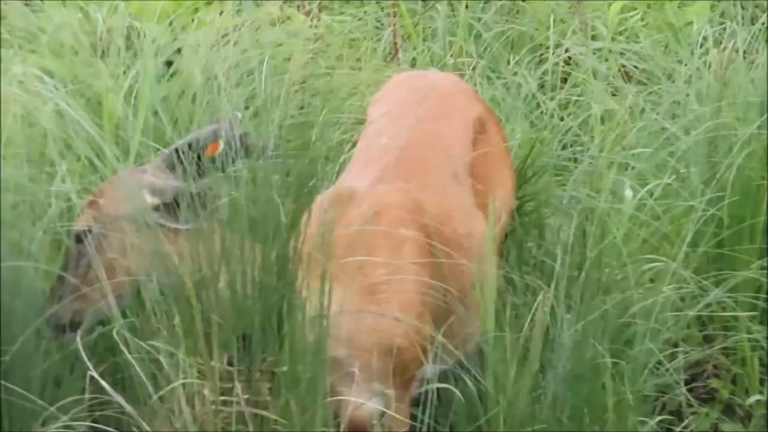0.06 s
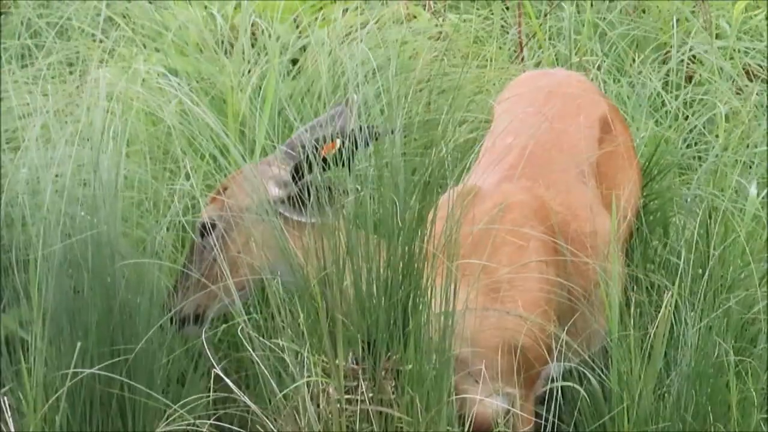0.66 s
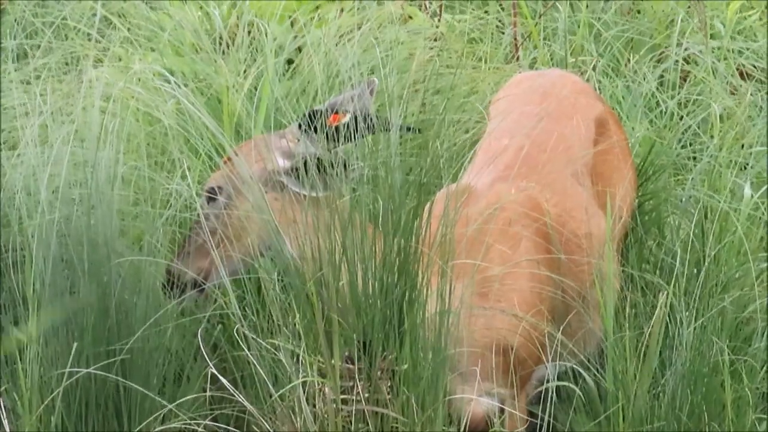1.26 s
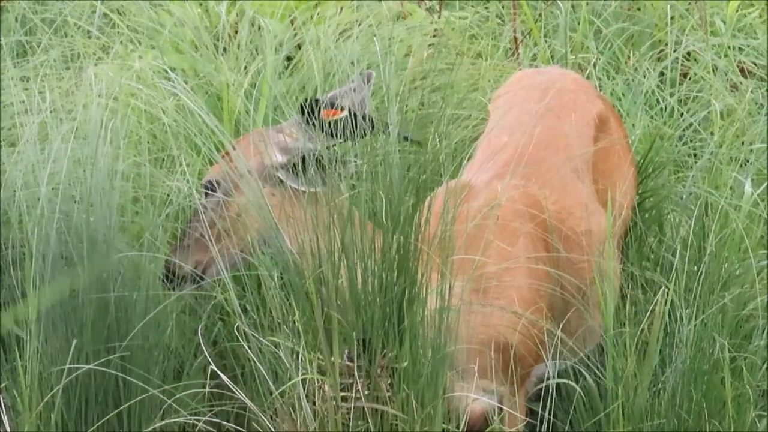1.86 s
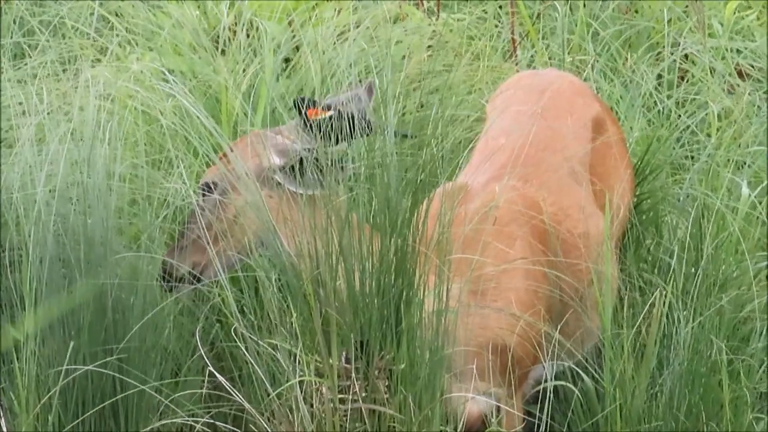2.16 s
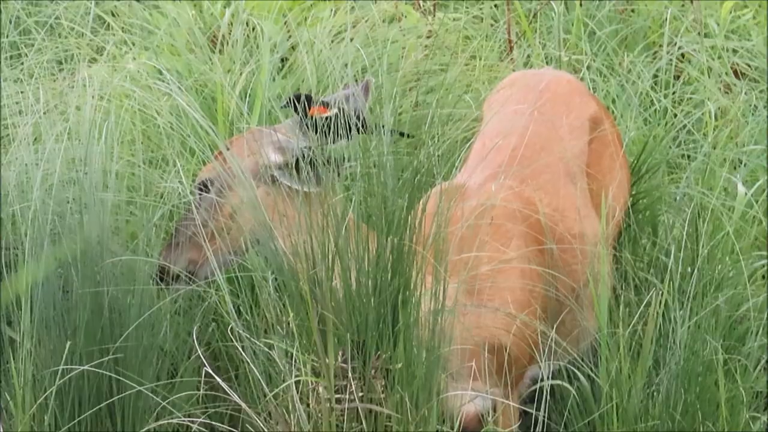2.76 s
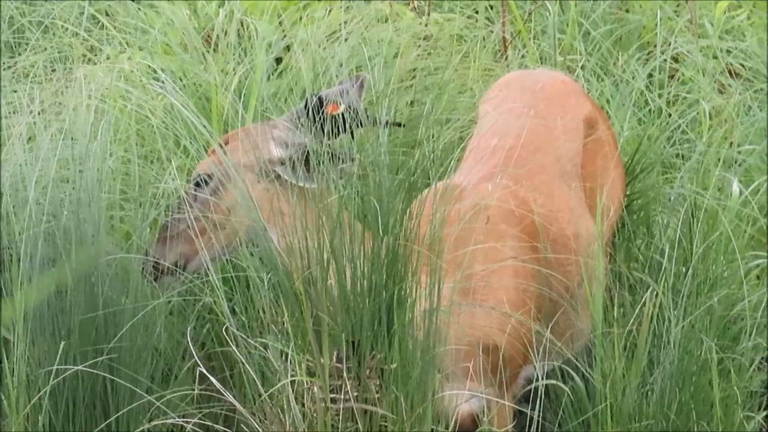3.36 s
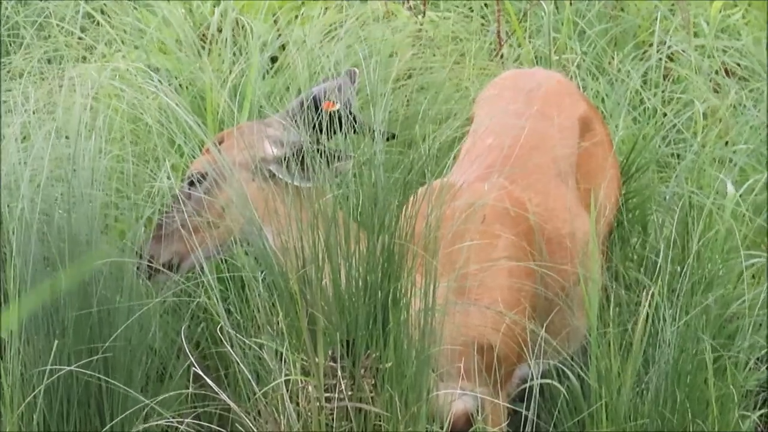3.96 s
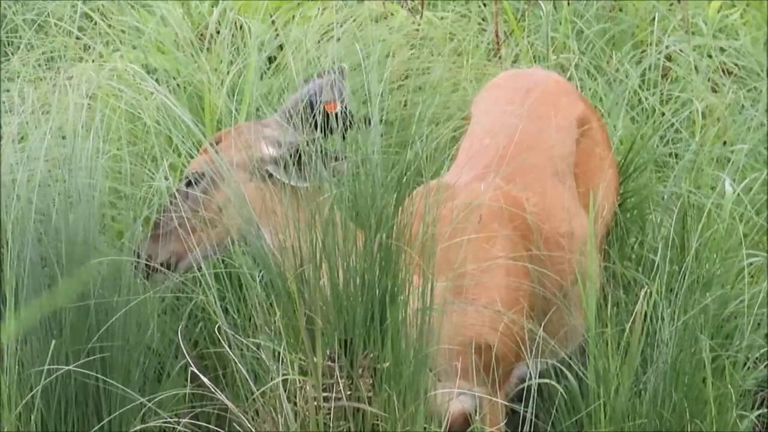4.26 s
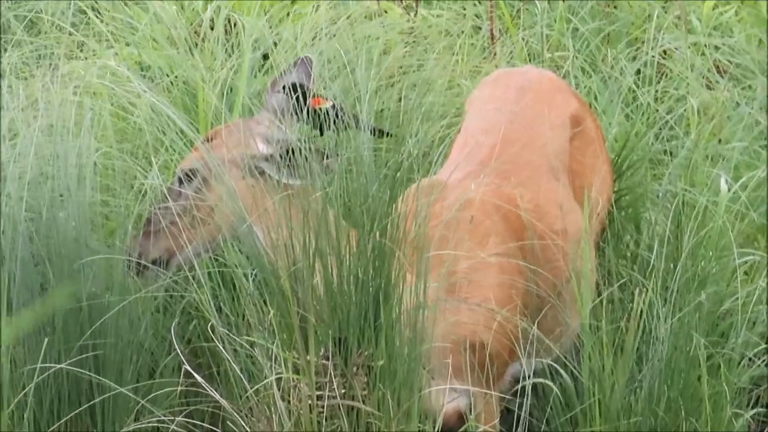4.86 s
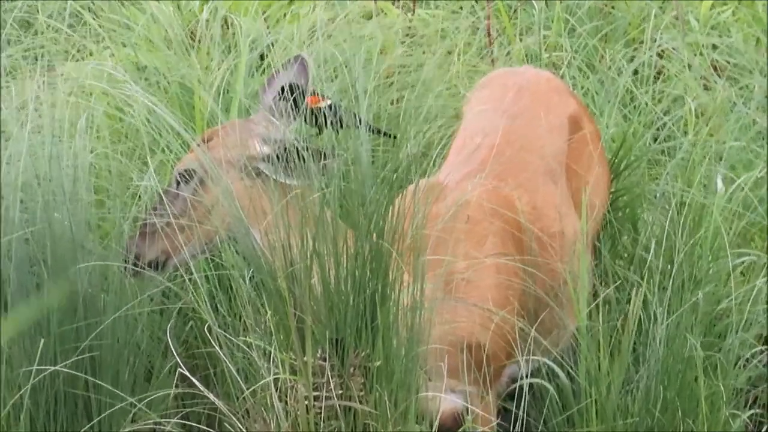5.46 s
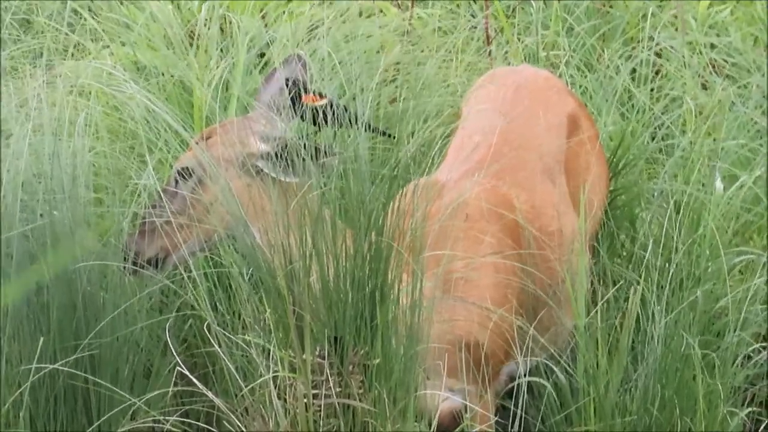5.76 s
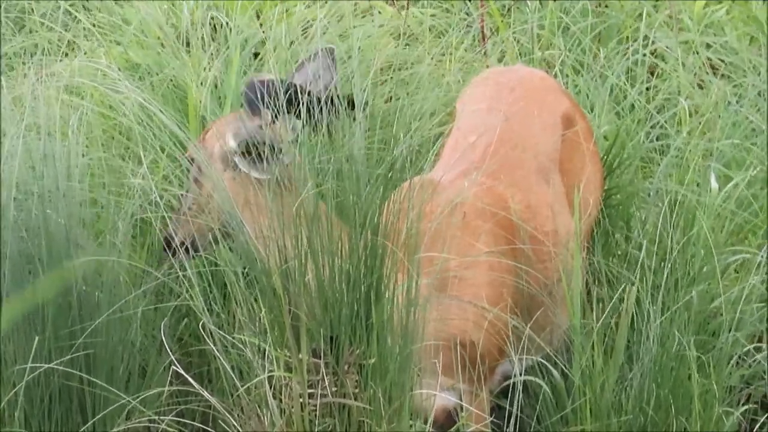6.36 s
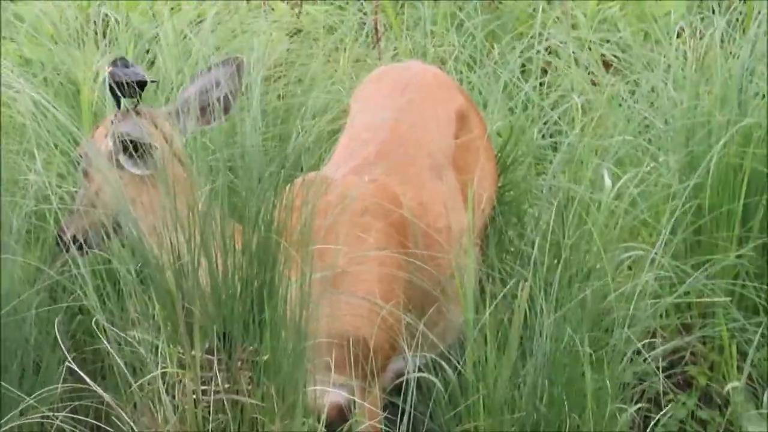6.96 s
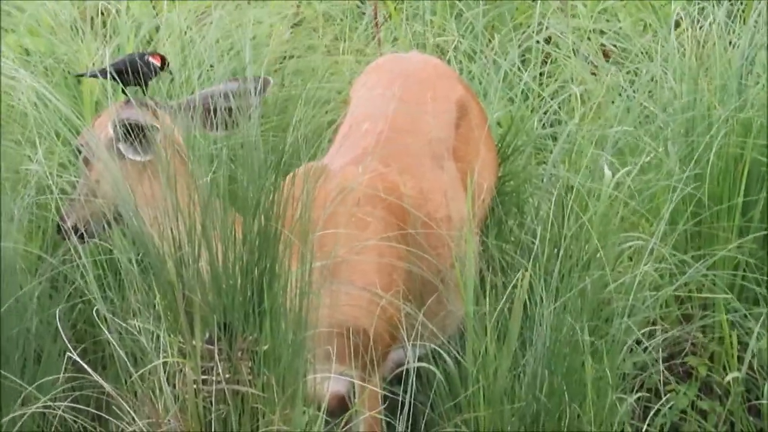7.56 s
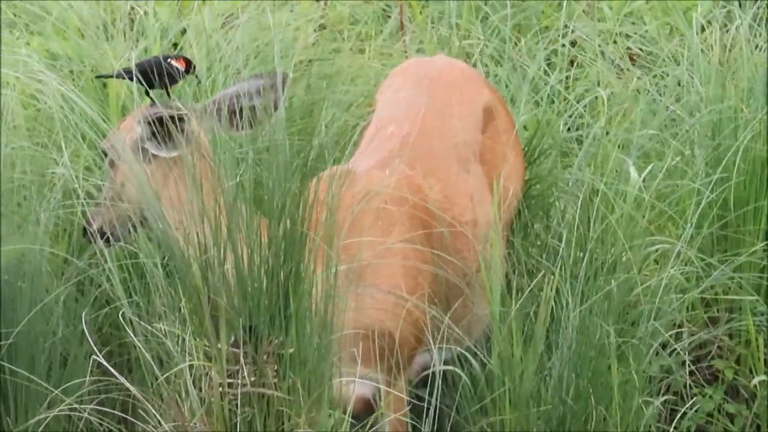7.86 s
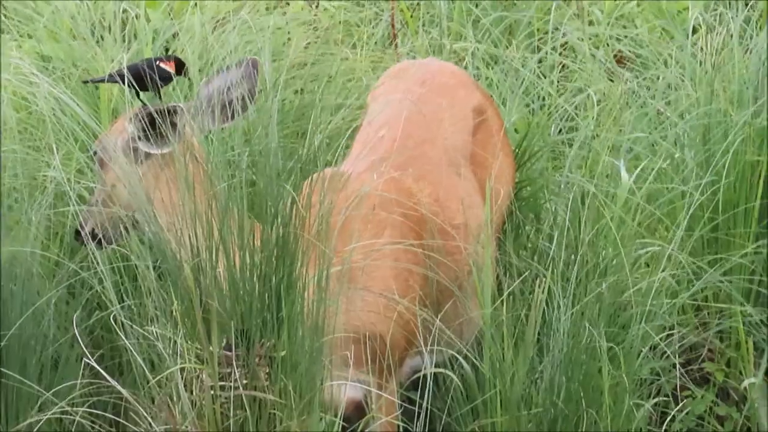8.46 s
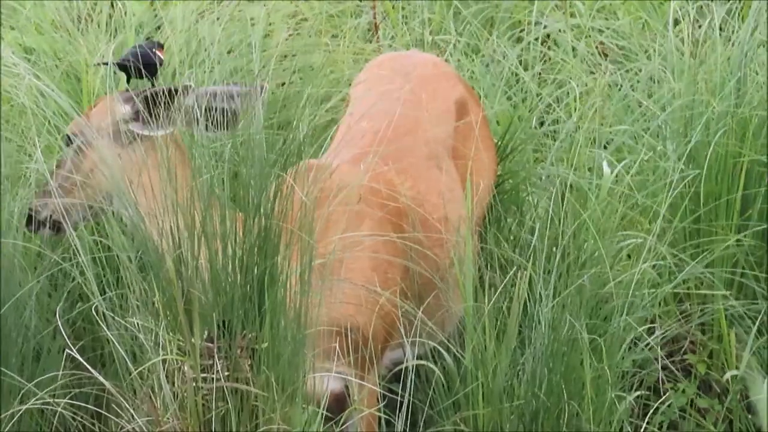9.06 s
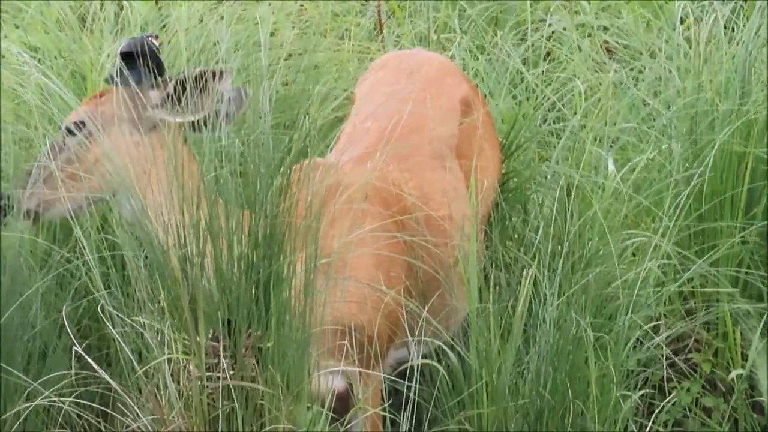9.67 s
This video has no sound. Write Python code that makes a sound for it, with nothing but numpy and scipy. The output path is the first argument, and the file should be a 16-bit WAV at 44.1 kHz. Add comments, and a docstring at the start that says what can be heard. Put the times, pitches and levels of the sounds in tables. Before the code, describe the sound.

Steady outdoor air with a nearby blackbird's harsh chirps and one loud buzzy whistle, then a faint songbird far away.

```python
"""An open marsh, a stereo microphone in a steady rush of air with a faint whir and two soft low swells. A red-
winged blackbird riding on a deer gives a sharp chek, a rasp, four falling chirps after a lead-in note, and a
loud buzzing whistle, all from breath driving the two membranes of its syrinx. Far off a songbird warbles in
pure glides, and faint ticks from the grass and a fluttering wing come now and then. The ground and the
vegetation send back a faint echo."""
import sys
import numpy as np
from scipy import signal
from scipy.fft import rfft, irfft, next_fast_len
from scipy.io import wavfile
from scipy.ndimage import map_coordinates

SR = 44100
rng = np.random.default_rng(int(sys.argv[2]) if len(sys.argv) > 2 else 0)


def persist_wave(psi):
    """Save psi, clipped to +-1, as 16-bit WAV."""
    counts = np.round(np.clip(psi, -1, 1) * 32767).astype(np.int16)
    wavfile.write(sys.argv[1], SR, np.atleast_2d(counts).T)


N = 428211


def amp(db):
    """Decibels to gain."""
    return 10 ** (np.asarray(db) / 20)


def unit(x):
    """x at rms 1."""
    return x / np.sqrt(np.mean(x ** 2) + 1e-20)


def along(points, hz):
    """(Hz, value) points read on a log frequency axis."""
    freqs, values = np.transpose(points)
    return np.interp(np.log(hz + 1), np.log(freqs + 1), values)


def span(start, end):
    """The sample times from start to end, in seconds."""
    return start + np.arange(max(round((end - start) * SR), 8)) / SR


def ramp(t, length):
    """0 before t = 0, rising straight to 1 over length."""
    return np.clip(t / length, 0, 1)


def envelope(t, start, end, attack, release):
    """Attack, hold at 1, release."""
    return ramp(t - start, attack) * ramp(end - t, release)


def settle(t, time_s):
    """1 until t = 0, then dying away exponentially."""
    return np.exp(-np.maximum(t, 0) / time_s)


def wobble(t, rate):
    """A smooth random curve, rate knots a second."""
    knots = (t - t[0]) * rate
    return map_coordinates(rng.standard_normal(int(knots[-1]) + 4), [knots])


def filtered(x, response):
    """x shaped by a frequency response."""
    n = x.shape[-1]
    padded = next_fast_len(n + 8192)
    return irfft(rfft(x, padded) * response(np.fft.rfftfreq(padded, 1 / SR)), padded)[..., :n]


def band(size, hz, width):
    """Noise of rms 1 in one resonance."""
    return unit(filtered(rng.standard_normal(size), lambda f: 1 / (1 + ((f - hz) / width) ** 2)))


def phase_of(hz):
    """Phase of an oscillator that follows a pitch curve."""
    return 2 * np.pi * np.cumsum(hz) / SR


def track(sounds):
    """(start in seconds, sound) pairs on one time line."""
    out = np.zeros(N)
    for start, sound in sounds:
        part = out[round(start * SR):][:len(sound)]
        part += sound[:len(part)]
    return out


# The air all around the microphone. Each row: frequency in Hz, relative noise density in dB.
AIR_SPECTRUM = [(20, -5), (35, -4), (55, 0), (120, -0.5), (280, -1), (450, -4.5), (700, -7), (1200, -11.5),
                (2000, -15), (4000, -20), (7000, -27), (10000, -33), (13500, -39.5), (15500, -44.5)]
# Its spread across the microphone pair. Each row: frequency in Hz, left-right correlation.
AIR_CORRELATION = [(25, 1), (60, 0.99), (95, 0.59), (150, 0.18), (330, -0.24), (520, -0.21), (1200, 0.052),
                   (2700, 0.12), (6000, .35), (10000, 0.24)]


def air():
    """The steady rush of the open field, alike left and right only in the bass."""
    def mid_and_side(hz):
        angle = np.arccos(np.clip(along(AIR_CORRELATION, hz), -1, 1)) / 2
        return amp(along(AIR_SPECTRUM, hz)) * [np.cos(angle), np.sin(angle)]

    mid, side = filtered(rng.standard_normal((2, N)), mid_and_side)
    level_db = -49 + .6 * wobble(np.arange(N) / SR, 3)
    return amp(level_db) * unit(np.array([mid + side, mid - side]))


# Dead centre, low in the rush of air. Each row: centre in Hz, relative width, level in dB.
WHIR_BANDS = [(512.6, 25, -70), (768, 32, -62.5), (845.2, 63, -57.5), (877, 14.6, -64.5), (1037, 20, -70.5)]


def whir():
    """A faint steady whir of narrow noise bands."""
    return sum(amp(db) * band(N, hz, width * .64) for hz, width, db in WHIR_BANDS)


def syrinx_tone(hz, second_db, third_db):
    """A bird's tone with two weak overtones."""
    phase = phase_of(hz)
    return np.sqrt(2) * sum(amp(db) * np.sin(k * phase) for k, db in enumerate([0, second_db, third_db], 1))


def chek(start=.2655, level_db=-37.2, attack_s=.014, decay_db_per_s=720):
    """A quick push of breath lifts the pitch of a harsh, fluttering tone half broken into noise."""
    t = span(0, .046)
    push = np.sqrt(ramp(t, attack_s)) * amp(-decay_db_per_s * np.maximum(t - attack_s, 0))
    hz = (3780 + 240 * push) * (1 + .032 * wobble(t, 900))
    flutter = .85 + .4 * band(len(t), 200, 150)
    tone = flutter * syrinx_tone(hz, second_db=-32, third_db=-40)
    side_tones = amp(-16.5) * band(len(t), 1650, 120) + amp(-21) * band(len(t), 2800, 120)
    hiss = amp(-18) * band(len(t), 3900, 5100)
    return start, amp(level_db) * push * (tone + side_tones + hiss)


# Faint ticks and knocks, well away from the microphone; the one near 6.63 s is a flutter of wings. # Each row:
# start in seconds, relative level in dB, centre in Hz, length in seconds.
FAINT_TICKS = [(.667, -51, 2400, .012), (1.234, -56, 1900, .006), (2.05, -46.5, 360, .022),
               (6.452, -56, 2600, .014), (6.633, -49, 900, .014)]


def faint_tick(start, db, hz, length):
    """A soft puff of noise from a bending stem, a step or a flutter of wings."""
    t = span(0, length)
    return start, amp(db) * np.sin(np.pi * t / length) * band(len(t), hz, hz / 3)


# Swells in the air on both sides of the microphone.
# Each row: crest time, rise and fall in seconds, level in dB.
AIR_SWELLS = [(2.0, .55, .15, -52.5), (6.36, .25, .25, -52)]


def air_swells():
    """A low rush that comes up softly twice, different left and right."""
    t = np.arange(N) / SR
    gain = sum(amp(db) * envelope(t, crest - rise, crest + fall, rise, fall)
               for crest, rise, fall, db in AIR_SWELLS)
    return gain * np.array([band(N, 220, 200), band(N, 220, 200)])


def rasp_voice(t, start, end, attack, release, db, fade_db_per_s, from_hz, to_hz, slide_at, slide_s):
    """Pitch and gain of one side of the syrinx: it swells, slides down one step and fades."""
    hz = to_hz + (from_hz - to_hz) * (1 - np.tanh((t - slide_at) / slide_s)) / 2
    fade_db = fade_db_per_s * np.maximum(t - start - attack, 0)
    return hz, envelope(t, start, end, attack, release) * amp(db - fade_db)


def rasp(start=3.051, end=3.257):
    """Two voices slide down together, lock into a rattle of upward flicks, then the upper one clears."""
    t = span(start, end)
    upper_hz, upper_gain = rasp_voice(t, start, end, attack=.046, release=.014, db=-42, fade_db_per_s=46,
                                      from_hz=3230, to_hz=2660, slide_at=3.122, slide_s=.032)
    lower_hz, lower_gain = rasp_voice(t, 3.062, 3.222, attack=.052, release=.03, db=-41.8,
                                      fade_db_per_s=82, from_hz=2600, to_hz=2315,
                                      slide_at=3.085, slide_s=.026)
    rough = envelope(t, 3.112, 3.222, attack=.022, release=.042)
    flick = np.cumsum(104 * (1 + .12 * wobble(t, 90))) / SR % 1
    bend = 1 + .15 * rough * (flick - .5)
    upper = phase_of(upper_hz * bend * (1 + .027 * rough * wobble(t, 600)))
    lower = phase_of(lower_hz * bend * (1 + .027 * rough * wobble(t, 497)))
    pair = upper_gain * np.sin(upper) + lower_gain * np.sin(lower)
    # the coupled membranes add sum and difference tones
    coupled = amp(-12) * np.sin(2 * upper - lower) + amp(-26) * np.sin(upper + lower)
    hiss = amp(-14.5) * rough * band(len(t), 4350, 250)
    rattle = amp(-2 * rough * np.cos(2 * np.pi * flick))
    return start, np.sqrt(2) * rattle * (pair + np.sqrt(upper_gain * lower_gain) * (coupled + hiss))


# The blackbird's chirps, a little left of the microphone; the first is only the falling end of one.
# Each row: time of the held note in seconds, begin and end in seconds from it, level in dB,
# held pitch in Hz, accent and second voice in dB relative to the level, fade-in in seconds.
BLACKBIRD_CHIRPS = [(3.287, .068, .124, -29.5, 3800, 0, -22, .014),
                    (3.4363, -.031, .122, -25.5, 3932, 4, -24, .006),
                    (3.581, -.034, .12, -27, 3877, 1.7, -22, .004),
                    (3.7258, -.032, .124, -27.4, 3902, 2.3, -23, .004),
                    (3.872, -.032, .085, -30, 3834, 1.2, -33, .008)]


def chirp(at, begin, end, level_db, held_hz, accent_db, under_db, fade_in):
    """Harsh downward flicks run into a held note, which falls away while a second voice rises under it."""
    flicks_per_s, ease_s = 115, .011
    break_at, break_s, bend_s, floor_hz = .054, .008, .006, 1800
    rise_db_per_s, sag_db_per_s, fade_db_per_s, sag_hz_per_s = 680, 31, 212, 730
    t = span(begin, end)
    stutter = ramp(-t, ease_s)
    broken = ramp(t - break_at, break_s)
    held_s = np.clip(t, 0, break_at)
    fallen_s = bend_s * np.logaddexp(0, (t - break_at) / bend_s)
    flick = ((t + .004) * flicks_per_s) % 1
    # the pitch overshoots, sags, then bends into the fall
    sagging_hz = held_hz + 127 * settle(t, .0125) - sag_hz_per_s * held_s
    hz = floor_hz + (sagging_hz - floor_hz) * settle(fallen_s, .051)
    jitter = (.002 + .014 * stutter + .011 * broken) * wobble(t, 900)
    hz *= 1 + .2 * stutter * (.5 - flick) + jitter
    # the level swells to an accent; at the break it catches, then turns weak and rough
    db = rise_db_per_s * np.minimum(t + ease_s / 2, 0) - sag_db_per_s * held_s
    db += accent_db * np.exp(-(t / .016 - .5) ** 2)
    catch_db = -5.5 * np.exp(-4 * ((t - break_at) / break_s - 1) ** 2)
    db += catch_db - 3.5 * broken - fade_db_per_s * fallen_s
    gate = 1 + stutter * (.3 - 1.1 * np.cos(np.pi * flick) ** 4) + .3 * broken * wobble(t, 400)
    # during the flicks the membrane flutters, throwing side tones and a little hiss
    flutter = 1 + .16 * stutter * np.sin(phase_of(880 * (1 + .1 * wobble(t, 200))))
    hiss = amp(-30) * stutter * band(len(t), 6000, 4000)
    note = amp(db) * (gate * flutter * syrinx_tone(hz, second_db=-59.5, third_db=-42.5) + hiss)
    under_at, under_hz, climb_hz_per_s = .06, 1900, 12500
    under_phase = phase_of((under_hz + climb_hz_per_s * (t - under_at)) * (1 + .01 * wobble(t, 600)))
    under_gain = np.sqrt(2) * amp(under_db) * envelope(t, under_at, .104, attack=.018, release=.012)
    under = under_gain * (np.sin(under_phase) + amp(-12) * np.sin(2 * under_phase))
    return at + begin, amp(level_db) * envelope(t, begin, end, fade_in, release=.01) * (note + under)


def squeak(start=4.457, end=4.482, from_hz=8400, to_hz=7200, level_db=-42.5):
    """A thin high tone just before the whistle slides down and levels out."""
    t = span(start, end)
    hz = to_hz + (from_hz - to_hz) * settle(t - start, .009)
    gain = amp(level_db) * envelope(t, start, end, attack=.008, release=.007)
    return start, np.sqrt(2) * gain * np.sin(phase_of(hz))


def buzz_sweep(cycle, jump=.26, jump_part=.12, sink_part=.34, gap_db=-16):
    """Pitch ratio and gain through one cycle of the buzz: the tone jumps up weakly, swells as it sinks."""
    ratio = 1 + jump * ramp(cycle, jump_part) * settle(cycle - jump_part, sink_part)
    late_swell = np.abs(np.sin(np.pi * cycle ** 1.58)) ** 1.4
    return ratio, amp(gap_db) + late_swell


def whistle(start=4.488, end=4.818, level_db=-23.4, grow_db_per_s=9):
    """A loud whistle: a pure high onset drops to a slowly sagging pitch as the buzz sets in."""
    drop_at, drop_hz, base_hz, sag_hz_per_s = 4.503, 1270, 3670, 620
    buzz_at, sweeps_per_s = 4.5115, 46.92
    t = span(start, end)
    hz = base_hz + drop_hz * settle(t - drop_at, .025) - sag_hz_per_s * (t - drop_at)
    db = level_db + grow_db_per_s * (t - t.mean())
    gain = amp(db) * envelope(t, start, end, attack=.074, release=.037)
    depth = envelope(t, 4.5, 4.804, attack=.02, release=.024)
    # the buzz starts a little hurried, then keeps its pace
    hurry_cycles = .62 * (1 - settle(t - buzz_at, .015))
    ratio, swell = buzz_sweep((sweeps_per_s * (t - buzz_at) + hurry_cycles) % 1)
    # the tone is least steady in the weak part of each sweep, where the pitch jumps
    jitter = (.003 + .018 * (1 - swell) ** 2 * depth) * wobble(t, 900)
    # as the buzz dies the pitch comes to rest in the middle of its sweep
    rest = 1 + .09 * ramp(t - drop_at, end - drop_at)
    phase = phase_of(hz * (depth * ratio + (1 - depth) * rest + jitter))
    second = amp(-37.5 + 3.5 * wobble(t, 410)) * np.sin(2 * phase)
    third = amp(-40.3 + 3.5 * wobble(t, 300)) * np.sin(3 * phase)
    sizzle = amp(-45) * band(len(t), 7700, 700) + amp(-55) * band(len(t), 13600, 1000)
    quiver = .1 * depth * wobble(t, 500)
    # the throat favours the low end of each sweep; the overtones swell much less
    fundamental = (swell ** depth + quiver) * np.sin(phase)
    overtones = swell ** (.55 * depth) * (second + third + sizzle)
    return start, np.sqrt(2) * gain * (fundamental + overtones)


def far_note(t, hz, db):
    """A pure note of the far songbird, made unsteady by the distance."""
    arch = np.abs(np.sin(np.pi * t / t[-1])) ** .49
    gain = amp(db + 2.4 * wobble(t, 120)) * arch
    return np.sqrt(2) * gain * np.sin(phase_of(hz * (1 + .004 * wobble(t, 385))))


# The songbird see-sawing far across the marsh.
# Each row: start in seconds, middle pitch in Hz, sweep in octaves, relative level in dB.
SONGBIRD_SLURS = [(5.337, 4000, -.7, -66), (5.41, 4150, .55, -67), (5.525, 3800, .45, -66),
                  (5.575, 3850, -.7, -66), (5.712, 3700, .55, -66.5), (5.905, 3450, -.5, -64),
                  (5.957, 3800, .7, -62.5), (6.088, 3700, .4, -61), (6.14, 3800, -.7, -64),
                  (6.277, 3950, .65, -61.5), (6.315, 4200, .35, -65), (8.68, 5250, -.3, -68),
                  (9.23, 5900, -.25, -68), (9.318, 5400, -.42, -65), (9.422, 3600, -.48, -62.5),
                  (9.481, 4850, .5, -64)]


def songbird_slur(start, middle_hz, octaves, db, length_s=.05, bow_octaves=.03):
    """One slightly bowed glide, up or down."""
    t = span(0, length_s)
    from_middle = t / length_s - .5
    hz = middle_hz * 2 ** (octaves * from_middle + bow_octaves * (2 * from_middle) ** 2)
    return start, far_note(t, hz, db)


# The same distant bird ending a phrase. Each row: start in seconds, pitch in Hz, relative level in dB.
SONGBIRD_ENDINGS = [(8.968, 4540, -62), (9.588, 4500, -52)]


def songbird_ending(start, hz, db, hold_s=.044, drop_s=.054, drop_octaves=.7, drop_db=11):
    """A held note that drops away in pitch and strength."""
    t = span(0, hold_s + drop_s)
    drop = ramp(t - hold_s, drop_s)
    return start, far_note(t, hz * 2 ** (-drop_octaves * drop ** 1.2), db - drop_db * np.sqrt(drop))


# The tail that reaches the microphone from the far vegetation.
# Each row: frequency in Hz, time to die away by 60 dB in seconds.
MARSH_DECAY = [(1000, .5), (4000, 0.57), (12000, .25)]


def marsh(x, grass_db=-21, tail_db=-26, ground_db=-18.5, ground_delay_s=.0075):
    """The ground answers within milliseconds, the grass scatters, far vegetation returns a faint tail."""
    hz, t, spectra = signal.stft(rng.standard_normal((2, SR // 2)), SR, nperseg=256)
    decay = amp(-60 * t / along(MARSH_DECAY, hz)[:, None])
    tail = signal.istft(spectra * decay, SR, nperseg=256)[1]
    lag = np.arange(tail.shape[1]) / SR
    grass = rng.standard_normal(tail.shape) * amp(-60 * lag / .05) * (lag > .003)
    echo = amp(grass_db) * grass / np.linalg.norm(grass[0]) + amp(tail_db) * tail / np.linalg.norm(tail[0])
    echo[:, round(ground_delay_s * SR)] += amp(ground_db)
    return x + signal.fftconvolve(x[None], echo, axes=1)[:, :N]


def from_left(x, lean_db, lead_ms):
    """A source on the left is louder and earlier on that side of the microphone."""
    sides = np.array([[1], [-1]])
    gain = amp(sides * lean_db / 2)
    return filtered(x, lambda hz: gain * np.exp(sides * 1j * np.pi * hz * lead_ms / 1000))


def scene():
    """Rasp and chirps come from the left, the other calls from ahead; far sounds carry more echo."""
    left = track([rasp()] + [chirp(*row) for row in BLACKBIRD_CHIRPS])
    ahead = track([chek(), squeak(), whistle()])
    songbird = track([songbird_slur(*row) for row in SONGBIRD_SLURS])
    songbird += track([songbird_ending(*row) for row in SONGBIRD_ENDINGS])
    ticks = track([faint_tick(*row) for row in FAINT_TICKS])
    blackbird = from_left(marsh(left), lean_db=2.9, lead_ms=.036) + marsh(ahead)
    distant = amp(-.5) * marsh(songbird + ticks, grass_db=-8, tail_db=-11)
    return blackbird + distant + air() + whir() + air_swells()


def record(dry, top_hz=15700):
    """Nothing passes above the band limit."""
    return filtered(dry, lambda hz: hz < top_hz)


dry = scene()
out = record(dry)
persist_wave(out)
```